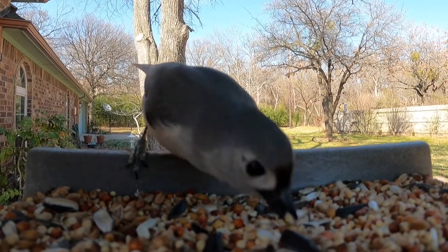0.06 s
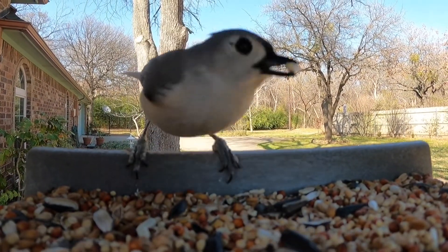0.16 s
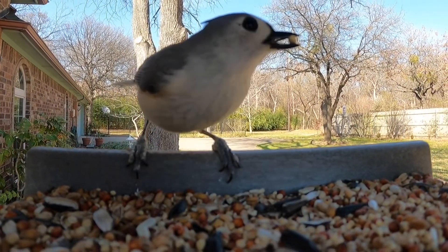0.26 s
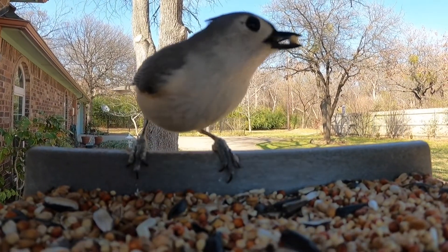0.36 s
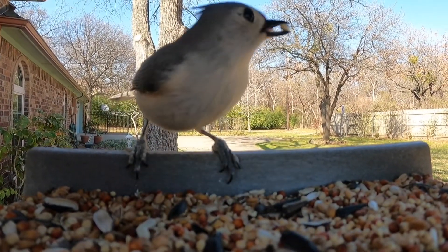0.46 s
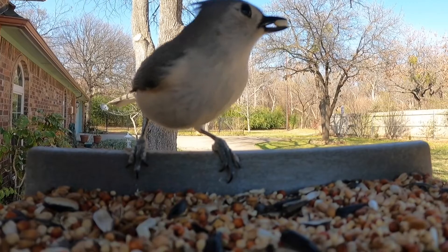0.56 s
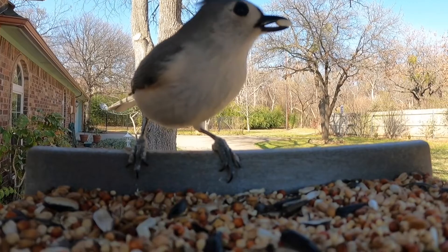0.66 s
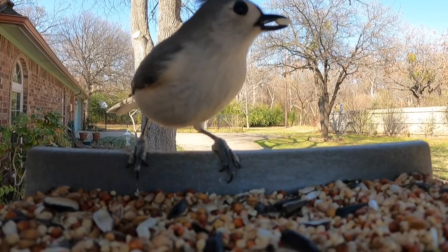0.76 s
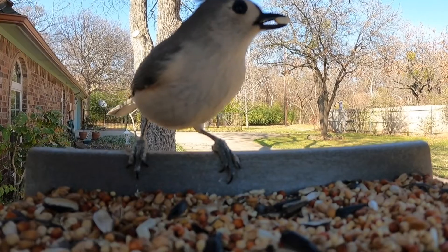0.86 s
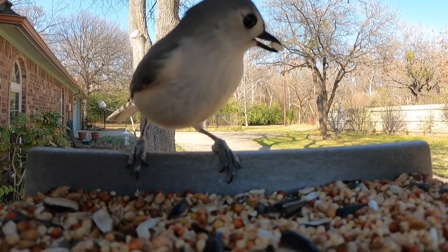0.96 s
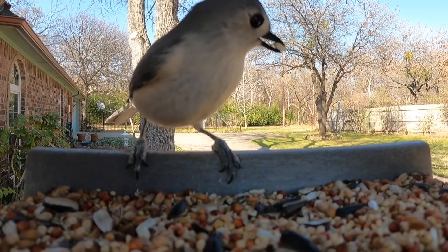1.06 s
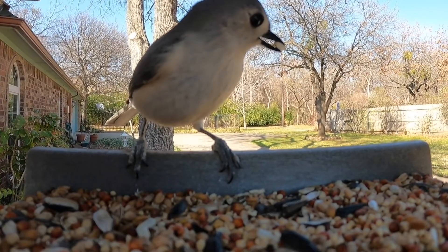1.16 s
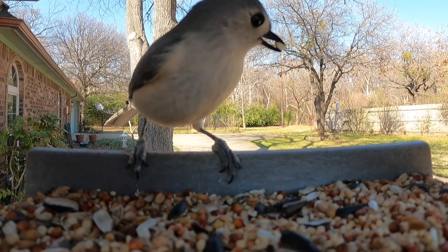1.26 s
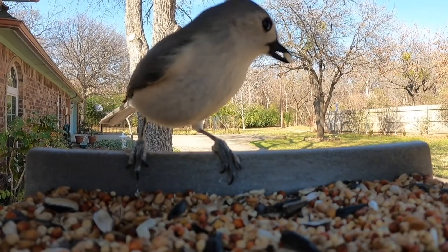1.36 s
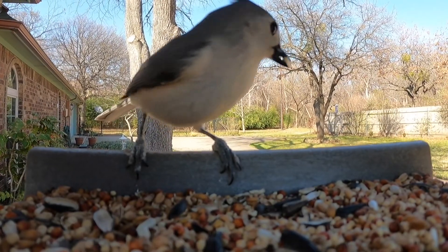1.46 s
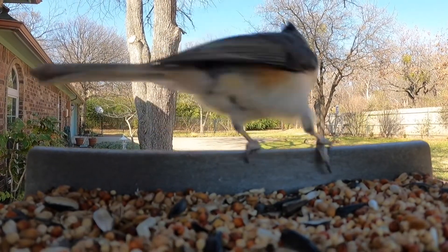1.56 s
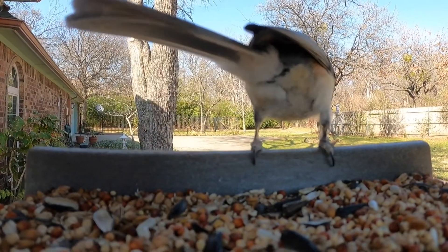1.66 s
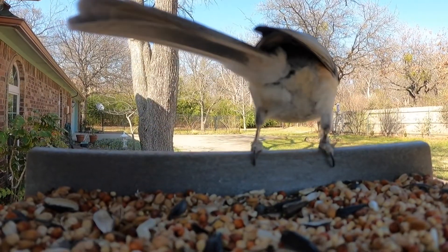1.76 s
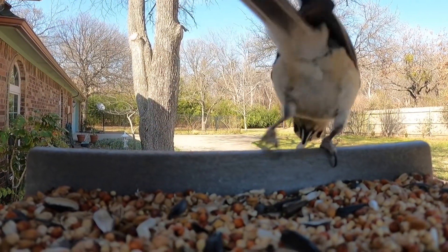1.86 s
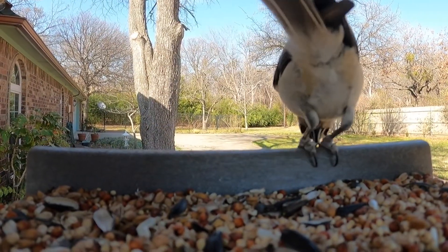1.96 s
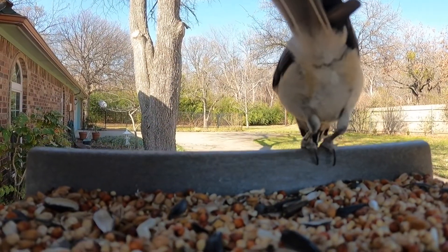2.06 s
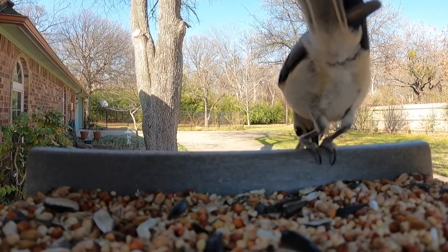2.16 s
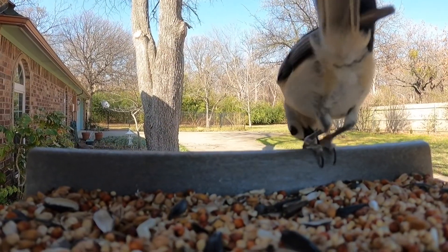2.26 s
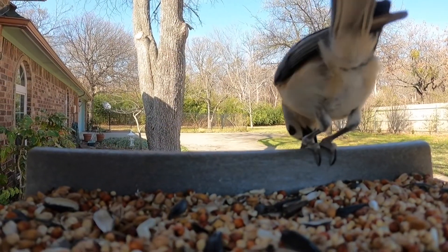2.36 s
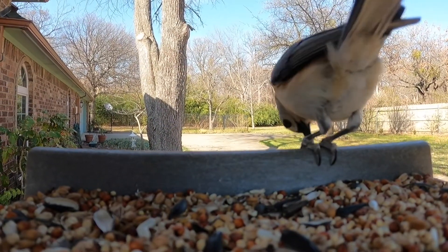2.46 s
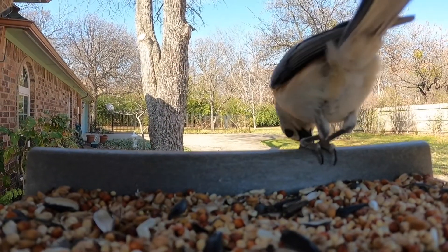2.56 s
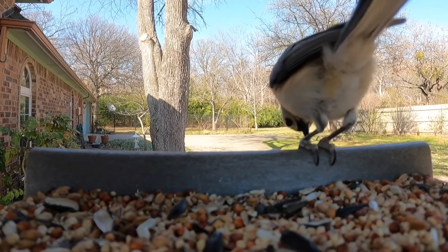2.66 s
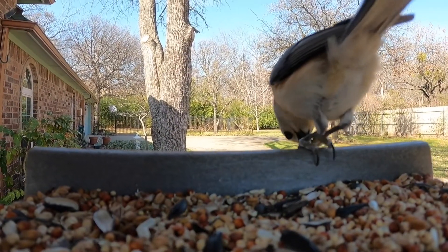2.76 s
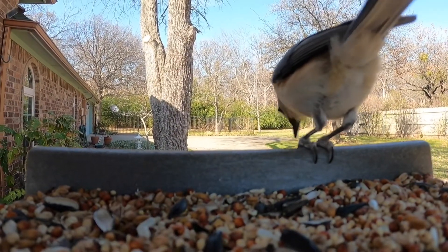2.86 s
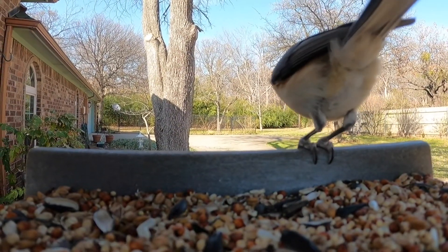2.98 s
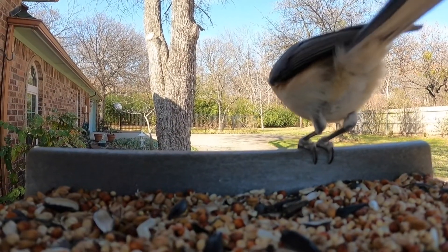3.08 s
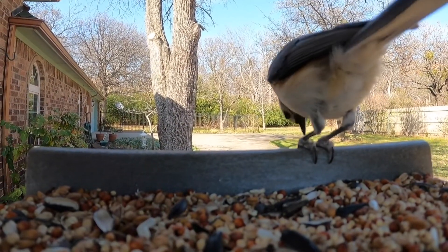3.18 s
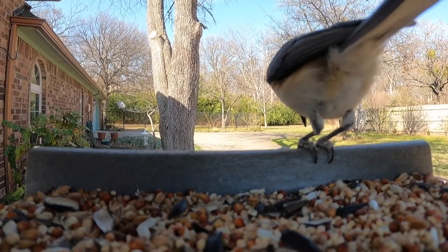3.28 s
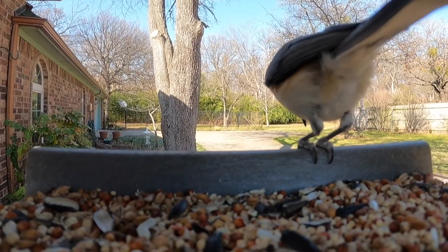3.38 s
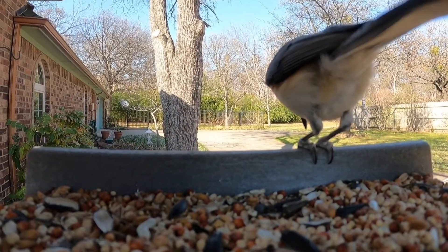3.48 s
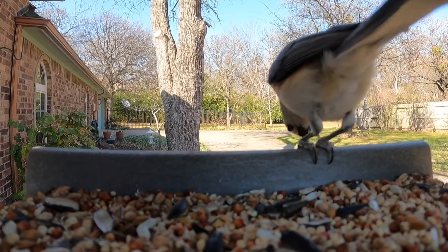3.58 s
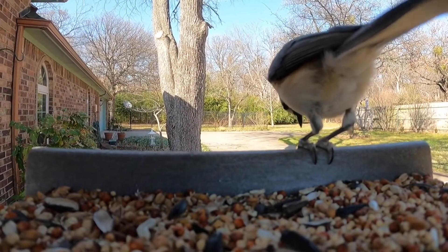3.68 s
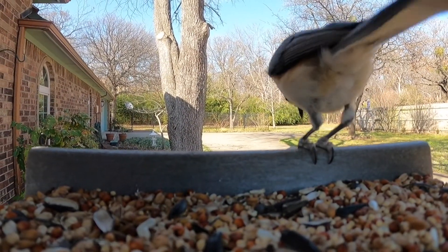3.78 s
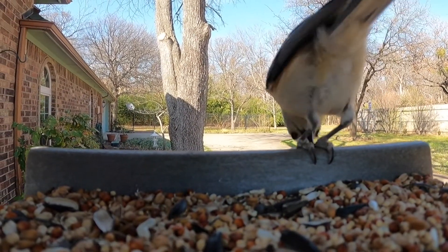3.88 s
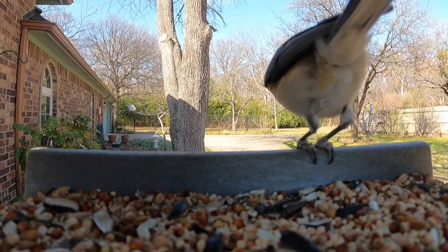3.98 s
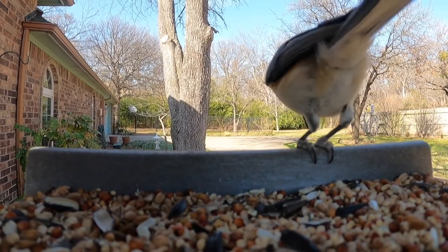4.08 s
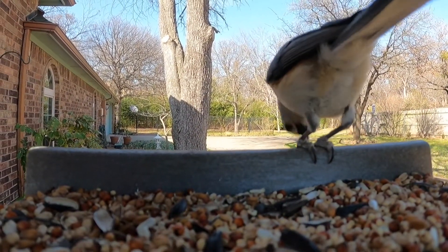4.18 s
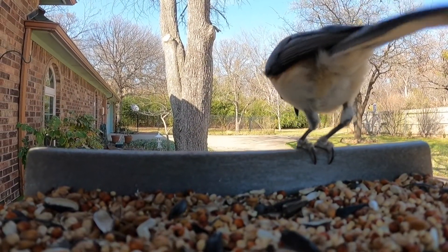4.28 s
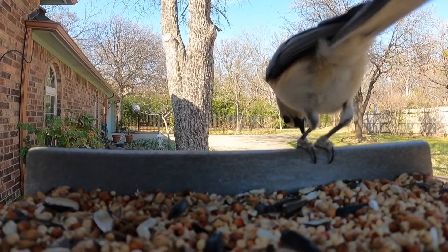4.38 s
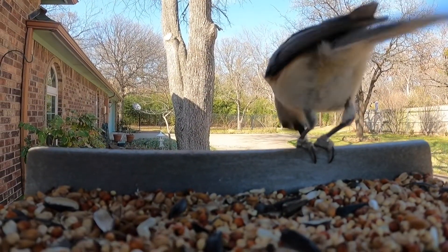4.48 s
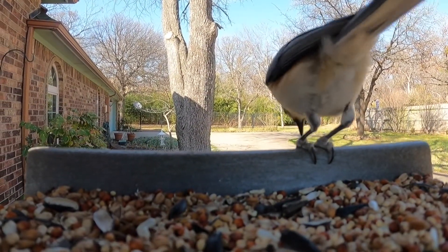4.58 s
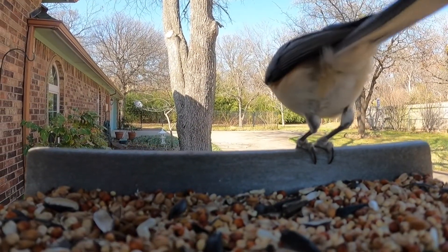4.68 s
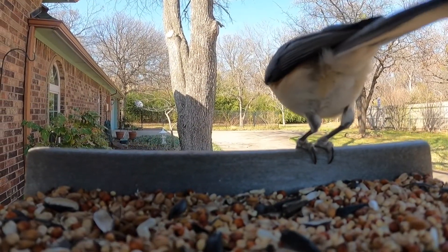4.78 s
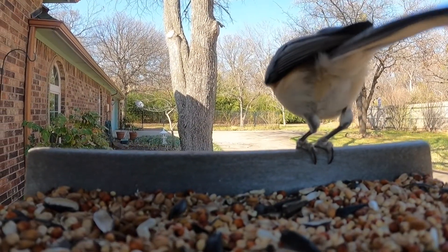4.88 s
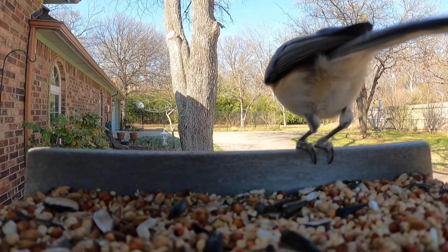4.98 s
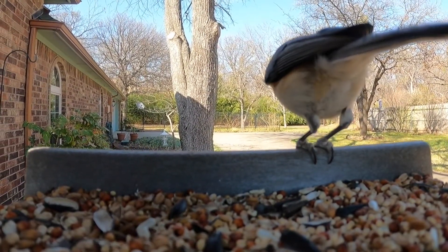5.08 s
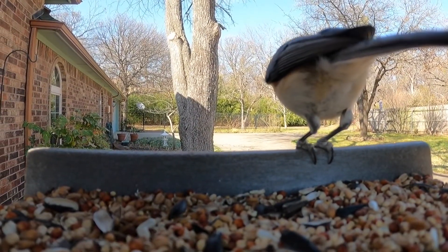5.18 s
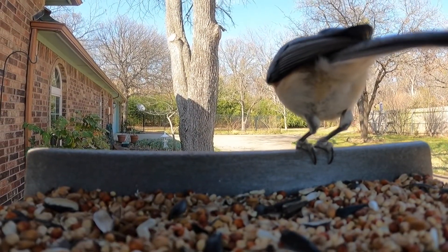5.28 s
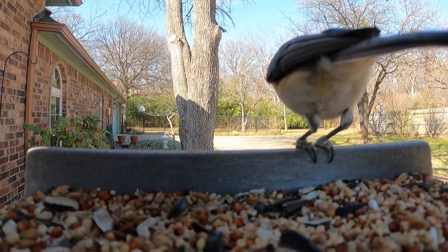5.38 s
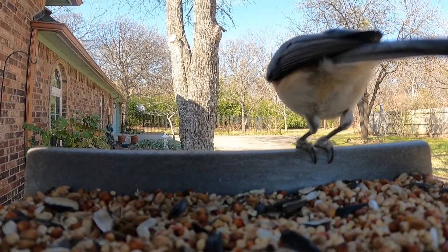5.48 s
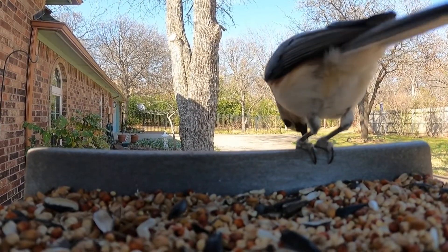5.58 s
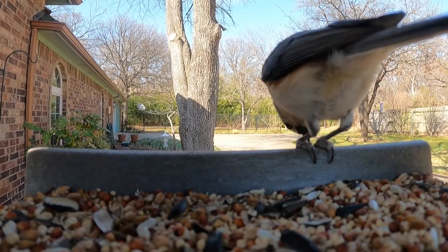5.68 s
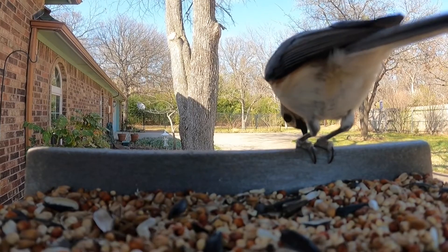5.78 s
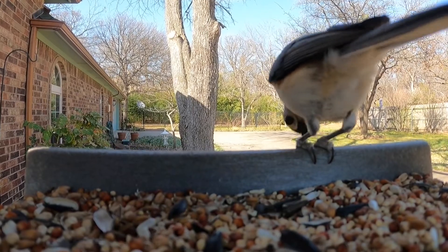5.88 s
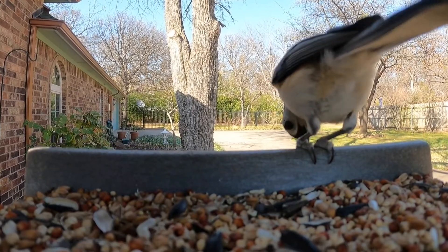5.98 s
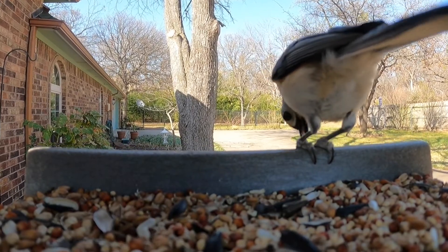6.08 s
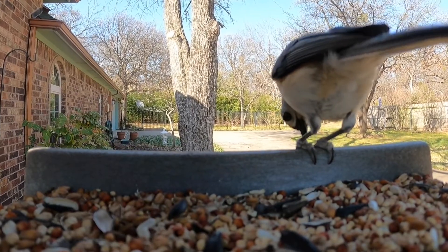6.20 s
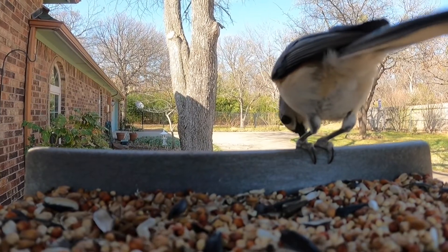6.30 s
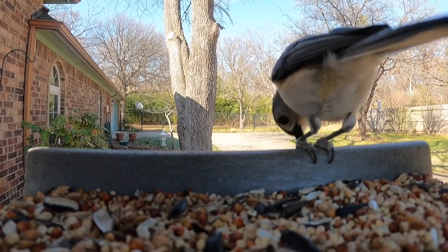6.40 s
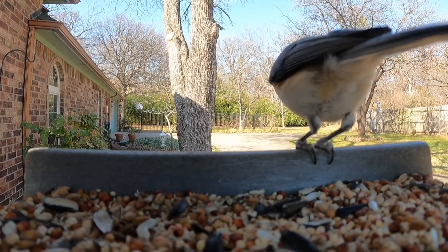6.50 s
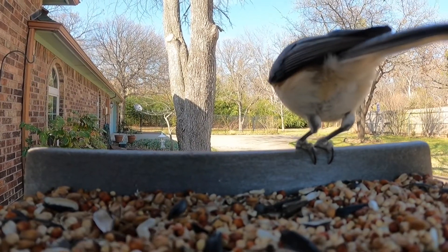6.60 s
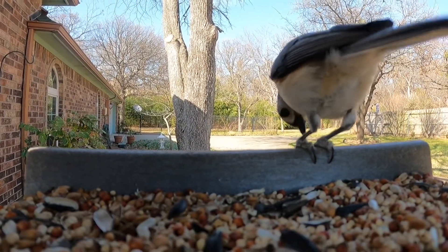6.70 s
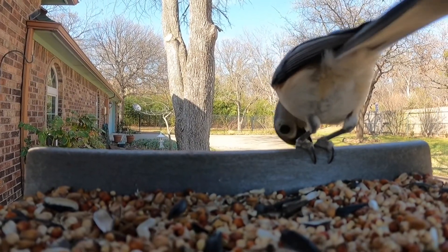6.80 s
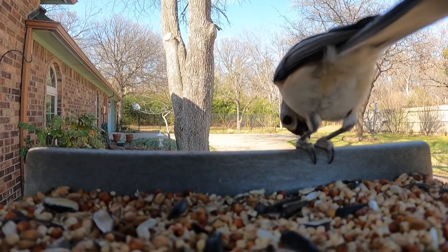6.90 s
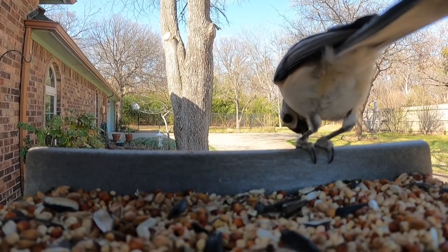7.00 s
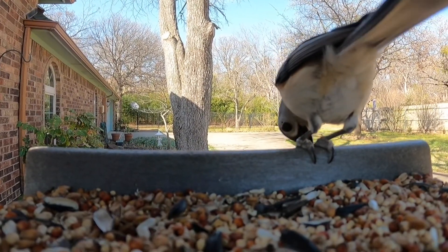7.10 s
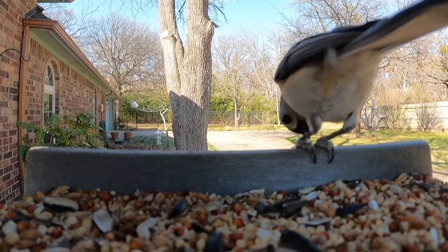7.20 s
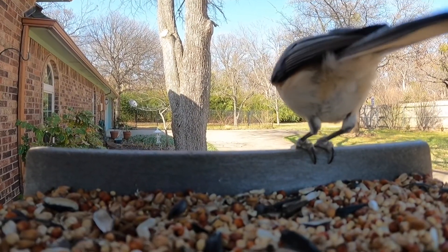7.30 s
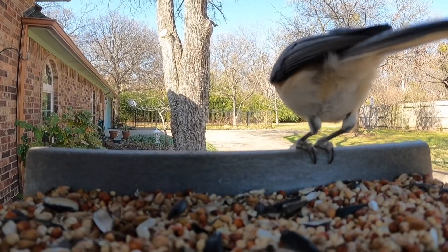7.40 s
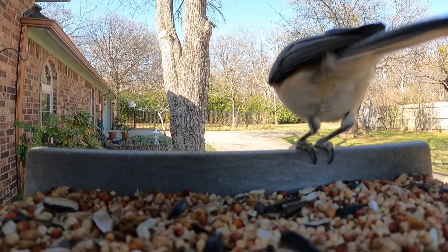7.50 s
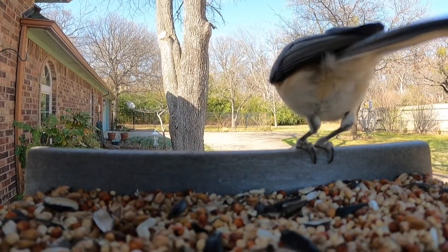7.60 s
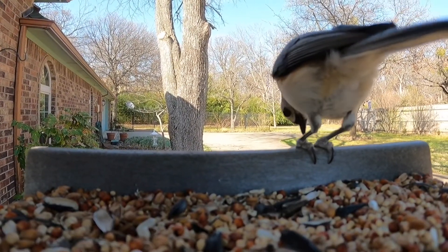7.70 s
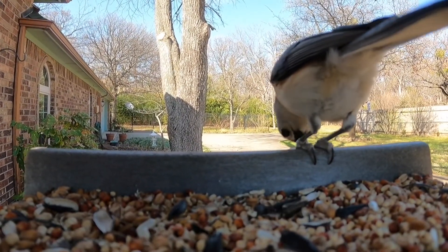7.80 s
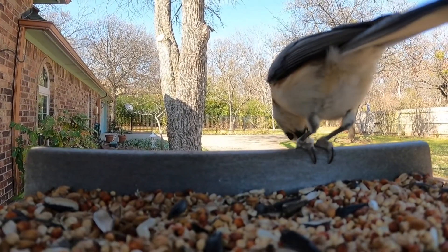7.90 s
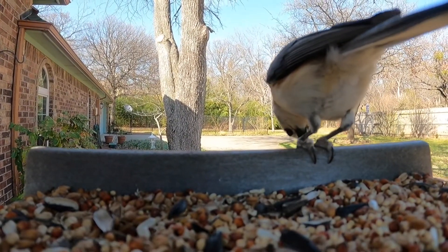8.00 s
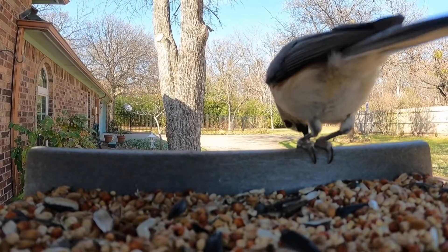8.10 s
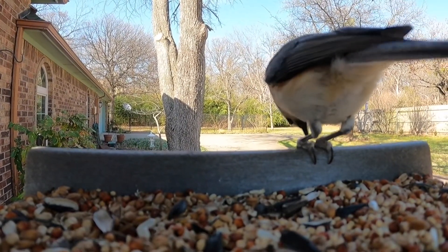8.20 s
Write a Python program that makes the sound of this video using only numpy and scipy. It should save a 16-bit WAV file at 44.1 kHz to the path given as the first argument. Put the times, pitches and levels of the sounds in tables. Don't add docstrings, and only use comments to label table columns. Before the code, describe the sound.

Close beak taps, claw scrabbles and husk crackles on a hollow plastic seed tray, with slow descending whistles echoing far across a quiet garden.

```python
import sys
import numpy as np
from scipy import signal
from scipy.fft import irfft
from scipy.io import wavfile
from scipy.ndimage import uniform_filter1d

SR = 44100
rng = np.random.default_rng(int(sys.argv[2]) if len(sys.argv) > 2 else 0)


def rack_gain(trim_db):
    fader = np.asarray(trim_db, float)
    return 10 ** (fader / 20)


def persist_wave(psi):
    counts = np.round(np.clip(psi, -1, 1) * 32767).astype(np.int16)
    wavfile.write(sys.argv[1], SR, np.atleast_2d(counts).T)


N = 363825

# start in seconds, peak in dB, ring in Hz, scrape in seconds.
BEAK_BLOWS = [(0.128, -65, 1240, 0.012), (1.671, -34, 1137, 0.0062), (2.013, -49, 1280, 0.0075),
              (2.123, -42.5, 1447, 0.0036), (2.278, -23.5, 1179, 0.0045), (2.299, -25.5, 1210, 0.0044),
              (2.381, -37, 1386, 0.0024), (2.631, -22, 1377, 0.0026), (2.674, -47.5, 1340, 0.0093),
              (2.828, -35, 1373, 0.0058), (3.316, -50, 744, 0.0071), (3.328, -38.5, 1260, 0.014),
              (3.679, -49.5, 880, 0.0059), (3.687, -43, 1260, 0.022), (3.809, -38, 870, 0.0065),
              (3.822, -35, 1200, 0.011), (3.968, -34.5, 1330, 0.013), (4.29, -41, 860, 0.0042),
              (4.3, -41, 1220, 0.017), (4.433, -40.5, 876, 0.0047), (4.443, -35.5, 1310, 0.014),
              (4.601, -34, 1300, 0.013), (6.031, -48.5, 1283, 0.011), (6.898, -38.5, 1160, 0.0072),
              (7.176, -38, 1310, 0.0051), (7.797, -60, 1430, 0.0065), (7.882, -50, 1200, 0.014)]
# pitch in Hz, width in Hz, level in dB.
HOUSING_RINGS = [(3020, 1100, -14), (3500, 420, 10), (4080, 190, -2), (5170, 470, 10), (6170, 440, -5),
                 (6890, 800, 2.5), (7800, 460, -3.5), (9200, 1100, -21.5), (10270, 140, -14.5),
                 (12100, 860, -15.5), (14700, 390, -24)]
# pitch in Hz, width in Hz, level in dB.
TRAY_RINGS = [(67, 35, 7), (129, 78, 1), (240, 34.7, 1.5), (363, 112, 4.5), (568.5, 100.5, 7.5),
              (742, 86, -14)]
# seconds after its start, upper partial in Hz, upper partial in dB,
# lower partial in dB.
WHISTLE_SHAPE = [
    (-.012, 1850, -28, -40),
    (0.017, 2510, -8, -12),
    (0.05, 2524, -9, -7),
    (0.095, 2505, -1, -9),
    (0.15, 2330, -4, -30),
    (.3, 2080, -2, -32),
    (.41, 1960, -1, -33),
    (.58, 1880, -8, -36),
    (.66, 1750, -20, -44),
]
# start in seconds, level in dB, extra hold on the top pitch in seconds,
# time factor (no unit), change to the upper partial at the start in dB.
WHISTLES = [
    (-.31, -82.5, 0.073, 1, -13),
    (0.664, -72, 0.073, 0.98, -10),
    (1.664, -60, 0.071, 0.96, -8.5),
    (2.723, -59, 0.039, 0.91, 7),
    (3.77, -61.5, 0.05, 0.97, 4),
    (4.824, -59, 0.0057, 0.97, -1.5),
]
# time in seconds, pitch in Hz, level in dB.
CHIP_PATH = [
    (1.826, 5570, -76),
    (1.831, 6200, -57.5),
    (1.851, 7360, -56.5),
    (1.866, 7580, -75),
    (1.892, 6960, -83),
]
# pitch in Hz, level in dB per Hz.
AIR_COLOUR = [(15, -48), (25, -32.5), (69, 7), (107, 0.5), (267, -7), (333, -16), (633, -16), (830, -28),
              (1260, -20.5), (1870, -35), (2520, -29.5), (4030, -45), (5550, -45.5), (9090, -56),
              (11800, -72), (20000, -100)]
# time in seconds, change in dB.
BREEZE = [
    (0.0, 4),
    (0.62, 0),
    (2.021, 11),
    (8.25, 9),
]
# pitch in Hz, likeness from 0 to 1.
AIR_LIKENESS = [(60, .6), (720, 0.66), (8640, 0.19)]
# start in seconds, peak in dB, pitch in Hz, length in seconds.
HUSK_RUBS = [(0.033, -63.5, 5440, 0.049), (3.458, -64.5, 5560, 0.011), (4.031, -60, 6620, 0.04),
             (5.078, -62, 7570, 0.021), (5.129, -67, 7660, 0.035), (5.221, -67.5, 7200, 0.011),
             (5.243, -62, 7800, 0.023), (5.322, -69, 6320, 0.026), (5.363, -71, 7250, 0.033),
             (5.412, -70, 6100, 0.052), (5.472, -54, 5340, 0.049), (5.509, -62, 5664, 0.029),
             (5.85, -52.5, 4090, 0.006), (6.266, -57.5, 6230, 0.047), (6.384, -66, 7950, 0.079),
             (6.623, -65, 5940, 0.025), (6.494, -60, 7320, 0.0054), (6.542, -70, 6870, 0.052),
             (6.724, -68, 7650, 0.021), (6.786, -58.5, 7600, 0.019), (6.806, -65, 7800, 0.048),
             (6.842, -55.5, 6330, 0.081), (7.141, -53.5, 5400, 0.025), (7.877, -57.5, 3020, 0.037),
             (0.882, -74.5, 5145, 0.1), (5.802, -71, 6670, 0.086), (6.04, -61, 6320, 0.047),
             (6.437, -67, 7500, 0.18), (5.495, -58.5, 3850, 0.061), (7.016, -54, 9200, 0.004),
             (1.599, -51, 4500, 0.051), (1.642, -42, 6750, 0.013), (1.679, -45, 3940, 0.041),
             (2.013, -58, 5270, 0.088), (2.283, -56, 5270, 0.028), (2.39, -58, 5300, 0.057),
             (7.149, -54, 2980, 0.045)]
# pitch in Hz, left over right in dB.
LEAN_BY_PITCH = [(70, 2), (140, 0.5), (240, -0.5), (570, -5.5), (1260, 3.5), (5300, 2.5), (7700, 10.5)]
# start in seconds, peak in dB.
BILL_NIBBLES = [
    (0.2236, -69),
    (0.287, -56.5),
    (0.448, -64.5),
    (0.51, -65.5),
    (0.575, -62),
    (0.639, -57.5),
    (0.298, -74),
    (0.568, -71.5),
    (0.705, -57),
]
# start in seconds, peak in dB, weight under the
# tick in dB.
CLAW_TICKS = [(0.1276, -46.5, -8.5), (0.1481, -57, -1.5), (1.6025, -45, -16), (1.6071, -42, 4),
              (1.6145, -32.5, -9), (1.6424, -35.5, -11.5), (1.6501, -39, 2.5), (1.6732, -35, 5),
              (1.6854, -33.5, -11), (1.7194, -53, -8), (1.9026, -58, -9), (1.9288, -48.5, -3.5),
              (1.9385, -47, -22), (1.9688, -43.5, -0.5), (1.9848, -43, -11), (2.004, -43.5, 2),
              (2.0103, -40, -1.5), (2.0305, -47.5, -11), (2.0847, -46.5, 0), (2.113, -46.5, -3),
              (2.1273, -46.5, 11.5), (2.1394, -46.5, -25), (2.153, -41, 2), (2.2085, -44, -3),
              (2.2203, -43, -1.5), (2.231, -42, -11),
              (2.2784, -43, 13.5), (2.298, -40, 6), (2.3145, -47, -12), (2.323, -48.5, -8),
              (2.381, -38.5, -3), (2.4082, -41, -23), (2.4254, -43, -9.5), (2.6275, -41, 11),
              (2.674, -45, 3), (2.686, -43.5, -23), (2.699, -38.5, -0.5), (2.712, -39, -10),
              (2.825, -39, 7.5), (2.8896, -41.5, 4.5), (2.907, -43.5, -13), (2.922, -42.5, -8),
              (2.934, -46, -10), (2.9625, -48.5, -3), (3.26, -54, -3), (3.274, -47, -10), (3.294, -52, -2),
              (5.727, -55, 15), (5.737, -45, -9), (5.746, -39.5, -5.5), (5.773, -59, 0), (5.7855, -44, -24)]
# start in seconds, peak in dB, weight under the tick in dB.
SHELL_CRACKS = [(3.3253, -53, -22), (3.3704, -56, -37), (3.679, -62.5, -10), (3.71, -41, -19.5),
                (3.8197, -52, -38.5), (3.9679, -50, 8), (3.9953, -42, -22.5), (4.0223, -53.5, 7.5),
                (4.435, -60.5, 21), (4.4745, -53.5, -5), (4.59, -55.5, 14), (4.6003, -43.5, 4),
                (3.438, -71, -11), (7.158, -62, 5), (7.187, -53, -2), (6.916, -62, 6), (6.93, -69, -8),
                (7.232, -69, 10), (4.9207, -72, -33), (6.0295, -51.5, 2), (6.4597, -57, 3),
                (6.4715, -43, -0.5), (6.8825, -45.5, 5.5), (6.8973, -36.5, -2), (6.907, -40.5, -10),
                (6.9676, -64, 2), (7.1679, -35, -2.5), (7.1756, -37.5, 5), (7.2201, -44, -2),
                (7.4634, -64.5, -1), (7.882, -63.5, 13), (7.891, -70, 12), (7.899, -67, 15),
                (7.909, -66, 12), (7.919, -67, 13), (8.005, -71, -2), (8.1882, -62.5, -3.5),
                (3.6857, -58, -10), (3.726, -50, -14), (3.756, -58, -5), (3.7905, -74, -11),
                (3.9212, -55, -23), (3.9447, -57, -17), (4.2884, -58, -11), (4.445, -51, 4),
                (4.5657, -76, -8), (4.0494, -63, -13)]
# start in seconds, peak in dB, shove in seconds.
WALL_KNOCKS = [(0.13, -51, 0.013), (1.604, -51.5, 0.016), (1.672, -38, 0.0078), (1.712, -51.5, 0.011),
               (2.078, -56.5, 0.021), (2.124, -48, 0.021), (2.28, -48.5, 0.02), (2.38, -49, 0.019),
               (2.631, -47.5, 0.0082), (2.673, -60, 0.0099), (2.7, -54.5, 0.0062), (2.775, -65.5, 0.0095),
               (2.827, -52.5, 0.0053), (2.887, -53, 0.0041), (2.92, -73, 0.023), (3.905, -59.5, 0.019),
               (4.609, -66, 0.0077), (5.726, -54.5, 0.016), (5.778, -56, 0.015), (6.899, -52.5, 0.026)]
# start in seconds, peak in dB, pitch in Hz, shove in seconds.
FLOOR_FLEXES = [(1.92, -54, 285, 0.023), (2.007, -44, 258, 0.011), (2.047, -48, 240, 0.012),
                (2.297, -38, 256, 0.012), (2.834, -39.5, 260, 0.014), (2.887, -53.5, 334, 0.062),
                (3.261, -52, 430, 0.017), (3.33, -39.5, 234, 0.013), (3.354, -36.5, 232, 0.018),
                (3.384, -45.5, 227, 0.022), (3.694, -39, 224, 0.028), (3.72, -36.5, 224, 0.021),
                (3.747, -40, 228, 0.024), (3.824, -34, 205, 0.022), (3.848, -42, 225, 0.014),
                (3.871, -42, 230, 0.0088), (3.967, -37.5, 293, 0.019), (3.999, -43, 237, 0.019),
                (4.301, -45, 229, 0.012), (4.326, -36, 197, 0.0085), (4.352, -39.5, 222, 0.011),
                (4.446, -42, 247, 0.01), (4.474, -38.5, 189, 0.019), (4.502, -54, 204, 0.013),
                (4.609, -42.5, 323, 0.0037), (4.635, -40, 193, 0.004), (4.647, -39.5, 217.2, 0.0079),
                (6.037, -41, 262, 0.0077), (6.466, -45.5, 204, 0.01), (6.887, -35, 258, 0.015),
                (6.905, -31.5, 237, 0.0087), (6.925, -51, 240, 0.0068), (7.162, -39.5, 233, 0.0049),
                (7.184, -35.5, 240, 0.0071), (7.211, -42, 258, 0.014), (7.885, -39, 234, 0.023),
                (7.912, -37.5, 196, 0.0076), (7.934, -50.5, 256, 0.011)]
# start in seconds, peak in dB, pitch in Hz.
FEEDER_ROCKS = [(0.017, -41.5, 184), (0.247, -43, 146), (0.267, -41, 127), (0.298, -47, 129),
                (0.403, -42, 140), (0.433, -47, 189), (0.587, -45.5, 102.4), (0.627, -47.5, 107.7),
                (1.001, -50.5, 158), (1.435, -48, 135.3), (2.431, -41, 101), (2.528, -32, 134),
                (2.573, -38, 100), (2.601, -42, 90.8), (3.487, -51.5, 109), (3.568, -54, 135.5),
                (3.655, -49, 131), (5.149, -53.5, 80.5), (5.928, -52, 77.7), (6.559, -48.5, 95)]
# start in seconds, peak in dB, pitch in Hz, left over right in dB.
HIGH_CHIPS = [(0.9385, -80, 6660, 10), (1.046, -72, 7600, 16), (1.0705, -65, 7100, 17),
              (1.086, -73, 6000, -12), (1.1144, -79, 7700, 2.5), (1.1475, -63, 7800, 18),
              (1.17, -68, 7060, 4), (5.1465, -65, 6260, 28), (5.2117, -68, 7340, 18),
              (5.343, -58.5, 6170, 20), (5.3829, -65, 7060, 8.0), (5.427, -67, 6300, 27),
              (5.774, -63, 6200, 5), (5.8219, -67, 5330, -3), (5.844, -58, 7860, 12),
              (5.9142, -73, 6700, 9), (5.9442, -56.5, 6700, 4), (5.9644, -67, 6600, 8.5),
              (5.982, -63, 7600, -1), (6, -61, 7500, 11), (6.044, -54, 4950, 0), (6.0651, -64, 5700, -15),
              (6.0886, -67, 6940, 18), (6.12, -70, 7200, 11), (6.25, -68, 6470, 2),
              (6.279, -48.5, 6760, 0), (6.33, -63, 6170, 6.0), (6.3811, -69, 5900, 3.5),
              (6.401, -55, 7400, 6), (6.42, -56, 9650, 12), (6.444, -67, 5050, 1), (6.52, -63, 6650, 13),
              (6.553, -71, 7000, 23), (6.5705, -68, 7200, 1), (6.6742, -79, 5060, 5),
              (6.7293, -78, 7700, 22), (6.7684, -71, 7360, 18), (6.8201, -69, 7350, 8.0),
              (6.857, -57, 6600, -5), (7.017, -42, 7400, 3), (7.049, -65, 7700, 1.0)]
# pitch in Hz, lead of the left in radians.
PORT_PHASE = [(0, 0), (1290, 0.1), (1720, -0.8), (2840, -0.7), (3190, -1.05), (5170, -1.1), (8790, -0.1)]
# start in seconds, peak in dB, pitch in Hz, length in seconds.
HOARSE_CALLS = [
    (3.525, -64, 3750, .03),
    (5.1, -67, 3280, .1),
    (5.23, -68, 3000, .05),
    (7.74, -76, 2500, .07),
    (7.83, -73, 2650, .06),
    (7.83, -75, 3350, .06),
    (7.94, -74, 3550, .06),
    (7.95, -72, 2150, .06),
    (8.07, -74, 3300, .09),
    (8.19, -74, 2550, .05),
]
# landing time in seconds, peak in dB.
BILL_SQUEAKS = [
    (3.818, -67),
    (3.966, -56.5),
    (4.297, -68),
    (4.445, -73),
    (4.599, -55),
]

RIM_HZ = 1256
NIBBLE_HZ, NIBBLE_WEIGHT_DB, NIBBLE_PAN_DB = 7400, -5, 6.5
CLAW_HZ, SHELL_HZ, DB_PER_OCTAVE = 4130, 3223, 34
WALL_HZ = 487
LEAD = SR // 2


def evened(x):
    return x / np.sqrt(np.mean(x ** 2) + 1e-20)


def peaked(x):
    return x / abs(x).max()


def read(points, hz):
    f, value = np.transpose(points)
    return np.interp(np.log(hz + 1), np.log(f + 1), value)


def add(mix, s, sound, pan_db):
    at = round(s * SR)
    part = mix[:, max(at, 0):][:, :len(sound) + min(at, 0)]
    sides = rack_gain(np.array([[pan_db / 2], [-pan_db / 2]]))
    part += sound[max(-at, 0):][:part.shape[1]] * sides


def resonate(x, hz, width):
    r = np.exp(-np.pi * width / SR)
    return signal.lfilter([1 - r, 0, r - 1], [1, -2 * r * np.cos(2 * np.pi * hz / SR), r * r], x)


def narrow(x, hz, width):
    return resonate(resonate(x, hz, width), hz, width)


def housing(x, share):
    total = 0
    for k, (part, (hz, width, db)) in enumerate(zip(share, HOUSING_RINGS)):
        total = total + (-1) ** k * part * rack_gain(db) * narrow(x, hz, width)
    return total


def echoes(x, t60, first_s, last_s, top_hz):
    t = np.arange(SR) / SR
    signs = rng.choice([-1., 1.], (2, SR))
    taps = signs * (rng.random((2, SR)) < .05) * rack_gain(-60 * t / t60) * (t > first_s)
    taps *= rack_gain(2.4 * np.repeat(rng.standard_normal((2, 100)), SR // 100, axis=1))
    taps = signal.lfilter(*signal.butter(2, top_hz, fs=SR), taps / (1 + (t / last_s) ** 8))
    taps = taps[:, :int(2.6 * last_s * SR)]
    return signal.oaconvolve(x, taps / np.linalg.norm(taps[0]), axes=1)[:, :x.shape[1]]


def air():
    frames, hz = N // 256 + 5, np.fft.rfftfreq(1024, 1 / SR)
    a, b, c, d, patches = rng.standard_normal((frames, 513, 5)).T
    patches = evened(uniform_filter1d(uniform_filter1d(patches, 10, 0), 12, 1))
    s, stir_db = np.transpose(BREEZE)
    t = np.arange(frames) * 256 / SR - .01
    high = np.clip(np.log2(hz / 200 + .01) / 16.1, 0, 1)[:, None]
    course = (0.85 + 2.0 * high) * np.interp(t, s, stir_db) - 9.85 * (1 - high)
    same = np.clip(read(AIR_LIKENESS, hz), -1, 1)[:, None]
    left = a + 1j * b
    right = same * left + np.sqrt(1 - same ** 2) * (c + 1j * d)
    z = np.array([left, right]) * rack_gain(read(AIR_COLOUR, hz)[:, None])
    z *= rack_gain(np.array([.4, -.4])[:, None, None] * read(LEAN_BY_PITCH, hz)[:, None])
    steady = signal.istft(z, nperseg=1024, noverlap=768)[1]
    level = rack_gain(-66) / np.sqrt(np.mean(steady ** 2))
    stirred = signal.istft(z * rack_gain(course + 1.76 * patches), nperseg=1024, noverlap=768)[1]
    return level * stirred[:, :N]


def whistles():
    out = np.zeros((2, N + LEAD))
    shape_s, hz, upper_db, lower_db = np.transpose(WHISTLE_SHAPE)
    opening = (shape_s < .06) * (shape_s > 0)
    for start, db, hold, stretch, shy_db in WHISTLES:
        s = shape_s * stretch + hold * (shape_s > .07)
        breath_s = shape_s * stretch + hold * (shape_s > .12)
        t = np.arange(s[0], s[-1], 1 / SR)
        wander = rng.standard_normal((2, SR))[:, :len(t)]
        quaver, breath = (evened(uniform_filter1d(v, 700)) for v in wander)
        husk = evened(uniform_filter1d(rng.standard_normal(SR), size=90))[:len(t)]
        turn = np.pi * np.cumsum(np.interp(t, s, hz) * (1 + 0.0049 * quaver)) / SR
        hoarse = husk * (rack_gain(-23) * np.sin(3 * turn) + rack_gain(-29.5) * np.sin(4 * turn))
        upper_level = rack_gain(np.interp(t, breath_s, upper_db + shy_db * opening) + 2 * breath)
        upper = upper_level * (np.sin(2 * turn) + hoarse)
        lower = rack_gain(np.interp(t, shape_s, lower_db) - 0.6 * min(shy_db, 0)) * np.sin(turn)
        add(out, LEAD / SR + start + s[0], rack_gain(db) * (upper + lower), 1.5)
    return out


def rocks():
    out, t = np.zeros((2, N)), np.arange(-1000, 4000) / SR

    def sway(u):
        fade = np.exp(np.where(u < 0, -(u / 0.19) ** 2, -u / 0.65))
        return fade * np.cos(2 * np.pi * u)

    for s, db, hz in FEEDER_ROCKS:
        late = t - 0.041 * rng.uniform(0.726, 1.27)
        swing = 0.22 * sway(late * hz * 0.77) - sway(t * hz)
        add(out, s + t[0], rack_gain(db) * (swing + 0.4 * narrow(swing, 297, 240)), 5)
    return out


def rubs():
    out, t = np.zeros((2, N)), np.arange(5000) / SR
    for s, db, hz, length in HUSK_RUBS:
        swell = t ** 2 * np.exp(-5.0 * t / np.clip(length, .005, .12))
        grit = rng.standard_normal(len(t)) * rng.exponential(1, len(t)) ** 2.0 * swell
        share = rng.random(len(HOUSING_RINGS))
        share = share * np.minimum(np.transpose(HOUSING_RINGS)[0] / hz, 1.15) ** 5
        rub = peaked(narrow(grit, hz, 320) + 0.28 * housing(grit, share))
        add(out, s - .005, rack_gain(db) * rub, read(LEAN_BY_PITCH, hz))
    return out


def ticks():
    out, t = np.zeros((2, N)), np.arange(2000) / SR
    rows = [(s, db, NIBBLE_HZ, NIBBLE_WEIGHT_DB, NIBBLE_PAN_DB, 4050, 500) for s, db in BILL_NIBBLES]
    for table, light_hz in ((CLAW_TICKS, CLAW_HZ), (SHELL_CRACKS, SHELL_HZ)):
        for s, db, weight_db in table:
            hz = light_hz * 2 ** (-weight_db / DB_PER_OCTAVE)
            rows.append((s, db, hz, weight_db, 4.5 * rng.standard_normal(), 2178, 1200))
    rare = np.where(np.transpose(HOUSING_RINGS)[0] > 9000, 3, 2)
    for s, db, hz, body_db, pan_db, body_hz, body_width in rows:
        spit = rng.standard_normal(len(t)) * np.exp(-((t - .005) / 0.0022) ** 2)
        thin = np.where((hz == NIBBLE_HZ) & (rare == 2), .3, 1)
        share = rng.random(len(HOUSING_RINGS)) ** rare * thin
        bright = 0.64 * peaked(narrow(spit, hz, 910)) + 0.66 * peaked(housing(spit, share))
        body = rack_gain(body_db) * peaked(narrow(spit, body_hz, body_width))
        add(out, s - .004, rack_gain(db) * (peaked(bright) + body), pan_db)
    return out


def blows():
    out, t = np.zeros((2, N)), np.arange(6000) / SR
    for s, db, hz, scrape in BEAK_BLOWS:
        fade = np.exp(-(t / np.clip(1.78 * scrape, .002, .1)) ** 1.52)
        force = (1 - np.exp(-t / (0.34 * scrape))) * fade
        grit = force * rng.standard_normal(len(t))
        main_hz = RIM_HZ if abs(hz - RIM_HZ) < 120 else hz
        ring = force * np.sin(2 * np.pi * main_hz * t)
        ring += 0.56 * peaked(narrow(grit, hz, 350)) + 0.25 * peaked(narrow(grit, 1550, 150))
        ring += 0.5 * peaked(narrow(grit, 1750, 1200))
        add(out, s - .0015, rack_gain(db) * peaked(ring), read(LEAN_BY_PITCH, hz))
    return out


def thumps():
    out, t = np.zeros((2, N)), np.arange(6000) / SR
    rows = [(s, db, WALL_HZ, shove, .4, 7.0) for s, db, shove in WALL_KNOCKS]
    rows += [(s, db - 9, hz, shove, .27, 9.0) for s, db, hz, shove in FLOOR_FLEXES]
    for s, db, hz, shove, width_share, db_per_octave in rows:
        jolts = rng.standard_normal(len(t)) * (rng.random(len(t)) < 450 / SR)
        jolts[100] = 1.84
        u = t / np.clip(shove, .002, .06)
        jolts *= u ** 0.079 * np.exp(-(u / 2.1) ** 2)
        struck = peaked(narrow(jolts, hz, width_share * hz))
        add(out, s - .004, rack_gain(db) * struck, read(LEAN_BY_PITCH, hz))
        for k, (f, width, ring_db) in enumerate(TRAY_RINGS):
            near_db = ring_db - db_per_octave * abs(np.log2(f / hz))
            answer = (-1) ** k * rack_gain(db + near_db) * peaked(narrow(jolts, f, width))
            add(out, s - .004, answer, read(LEAN_BY_PITCH, f) + 0.7 * rng.standard_normal())
    return out


def loose_seed(knock):
    shake = np.sqrt(signal.lfilter([1 / 900], [1, 1 / 900 - 1], knock ** 2))
    size = rack_gain(1.9 * np.minimum(rng.exponential(1, (2, N)), 5)) * (rng.random((2, N)) < 1400 / SR)
    grains = size * rng.standard_normal((2, N))
    grains = grains + 0.28 * grains[::-1]
    dull = narrow(grains, 1300, 2000)
    bright = housing(grains, np.ones(len(HOUSING_RINGS)))
    return shake * (rack_gain(-23.0) * evened(dull) + rack_gain(-44.0) * evened(bright))


def high_chips():
    out, t = np.zeros((2, N)), np.arange(1500) / SR
    for s, db, hz, pan_db in HIGH_CHIPS:
        spit = rng.standard_normal(len(t)) * t * np.exp(-t / 0.0023)
        stray_hz = hz * 2 ** rng.uniform(-0.447, 0.49, 2)
        strays = sum(peaked(narrow(spit, f, 540)) for f in stray_hz)
        ring = peaked(narrow(spit, hz, 600)) + 0.39 * strays
        add(out, s - .002, rack_gain(db - 5.5) * peaked(ring), pan_db)
    return out


def chips():
    out = np.zeros((2, N))
    s, hz, db = np.transpose(CHIP_PATH)
    t = np.arange(s[0], s[-1], 1 / SR)
    tone = np.sin(2 * np.pi * np.cumsum(np.interp(t, s, hz)) / SR)
    add(out, s[0], rack_gain(np.interp(t, s, db)) * tone, -1.5)
    return out


def far_calls():
    out = np.zeros((2, N))
    for s, db, hz, length in HOARSE_CALLS:
        breath = rng.standard_normal(SR // 5)[:int(length * SR)]
        add(out, s, rack_gain(db) * np.hanning(len(breath)) * peaked(narrow(breath, hz, 240)), 0)
    return out


def squeaks():
    out, t = np.zeros((2, N)), np.arange(-2000, 2000) / SR
    squeak_hz, slide_s, fade_s = 7950, 0.0051, 0.014
    for s, db in BILL_SQUEAKS:
        swell = np.exp(np.where(t < 0, t / slide_s, -t / fade_s))
        husky = evened(narrow(rng.standard_normal(len(t)), squeak_hz, 300))
        tone = np.sin(2 * np.pi * squeak_hz * t) + 0.52 * husky
        add(out, s + t[0], rack_gain(db) * peaked(swell * tone), 4.0)
    return out


def ports(x):
    half = read(PORT_PHASE, np.fft.rfftfreq(512, 1 / SR)) / 2
    taps = irfft(np.exp(1j * np.array([half, -half])))
    taps = np.roll(taps, 256, axis=1) * np.hanning(512)
    return signal.oaconvolve(x, taps, axes=1)[:, 256:N + 256]


def scene():
    whistle, chip, rim, knock = whistles(), chips(), blows(), thumps()
    high_echo = narrow(whistle, 2400, 640)
    high_echo = echoes(high_echo, 2.6, 0.025, 0.34, 3800) + .3 * echoes(whistle, 0.6, 0.006, 0.07, 4000)
    far = (0.6 * whistle + rack_gain(5) * high_echo)[:, LEAD:]
    far += chip + rack_gain(-2) * echoes(chip, 0.16, 0.0028, 0.095, 9500) + far_calls()

    crack = rubs() + high_chips() + squeaks() + ticks()
    near = crack + rack_gain(-18) * echoes(crack, .055, .002, .035, 7400)
    near += rim + rack_gain(-23) * echoes(rim, .12, .004, .07, 5000)

    knock_rock = knock + rocks()
    low = knock_rock + rack_gain(-17) * echoes(knock_rock, .05, .003, .05, 150)
    low = signal.lfilter(*signal.butter(2, 42, "high", fs=SR), low)

    seed = loose_seed(1.54 * resonate(knock, 180, 210) + 1.1 * rim + 2.77 * crack)
    return ports(near + low) + far + air() + seed


def roll_off(x):
    return signal.sosfilt(signal.butter(12, 15500, fs=SR, output="sos"), x)


def record(dry):
    heard = signal.lfilter(*signal.butter(3, 8600, fs=SR), dry)
    return roll_off(heard)


dry = scene()
out = record(dry)
persist_wave(out)
```